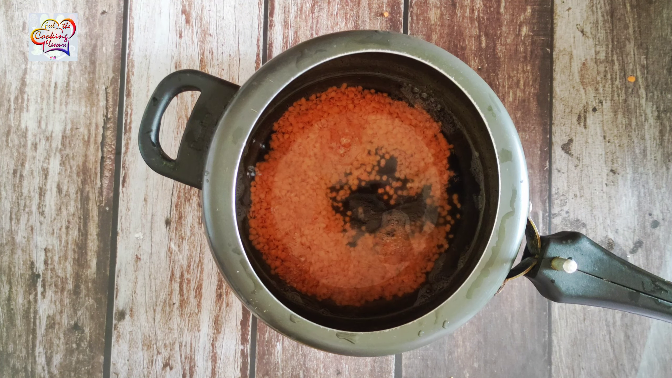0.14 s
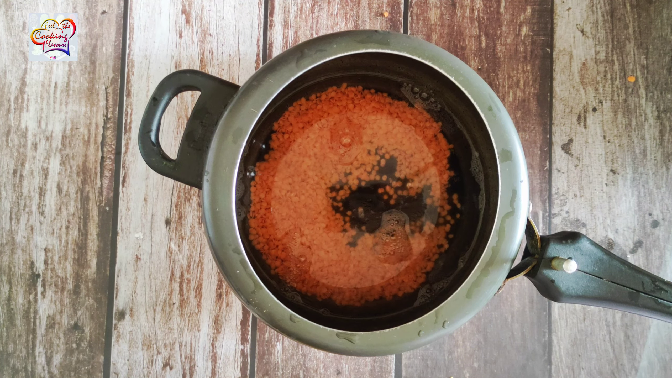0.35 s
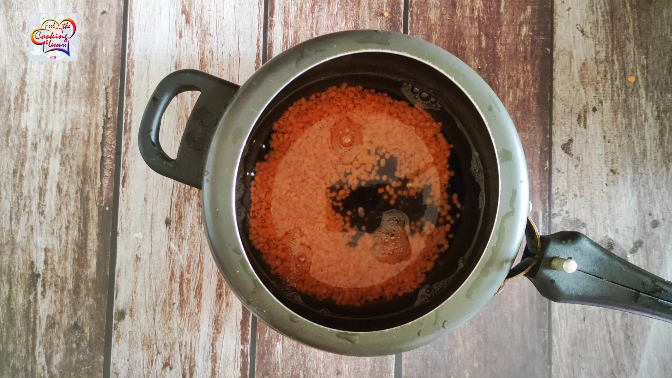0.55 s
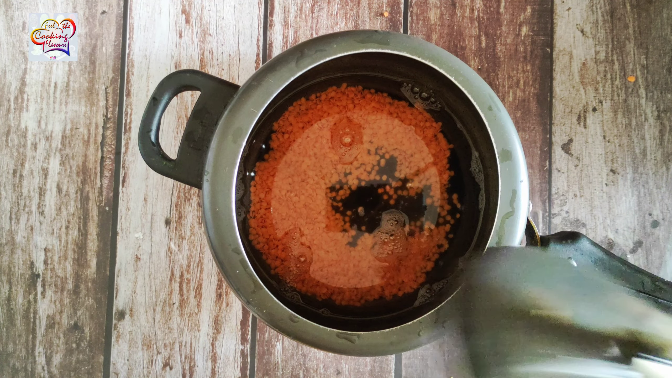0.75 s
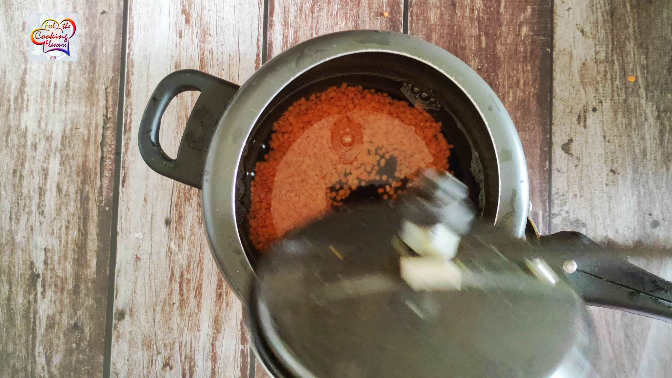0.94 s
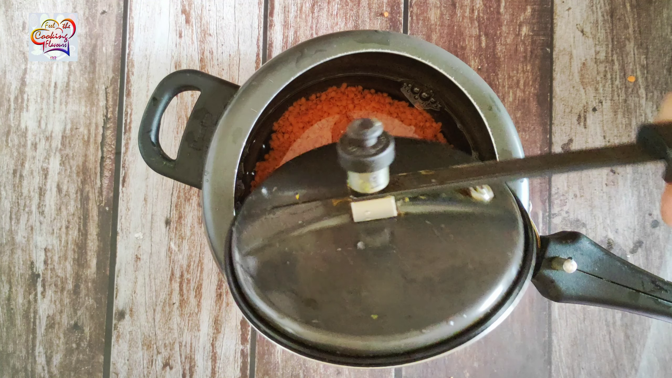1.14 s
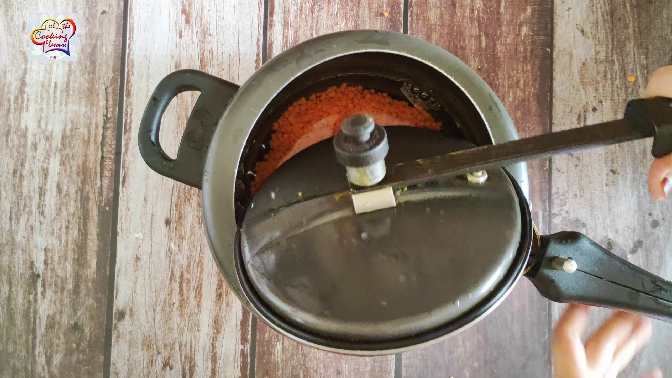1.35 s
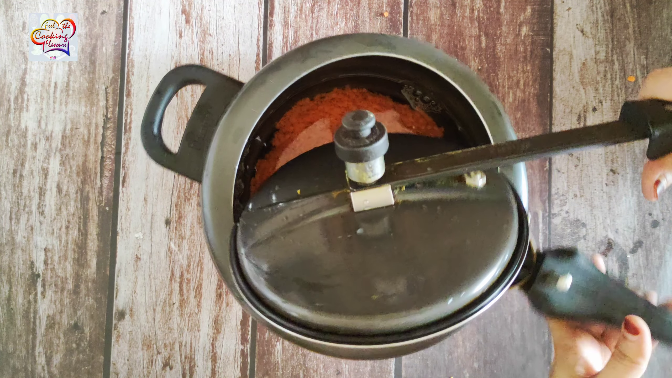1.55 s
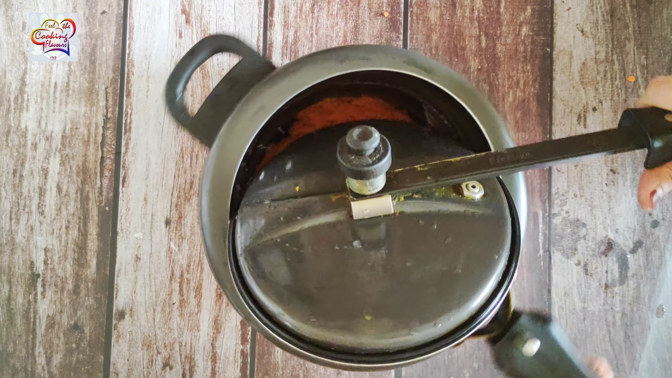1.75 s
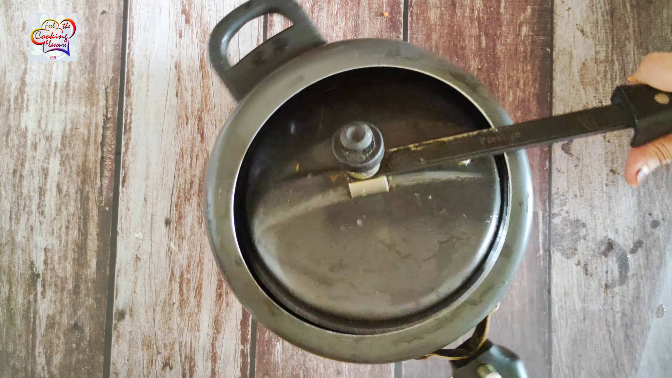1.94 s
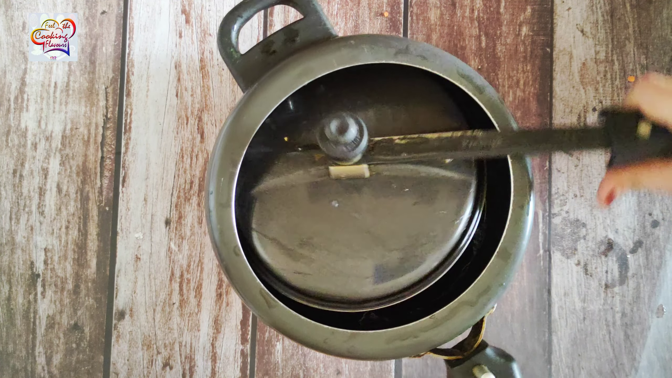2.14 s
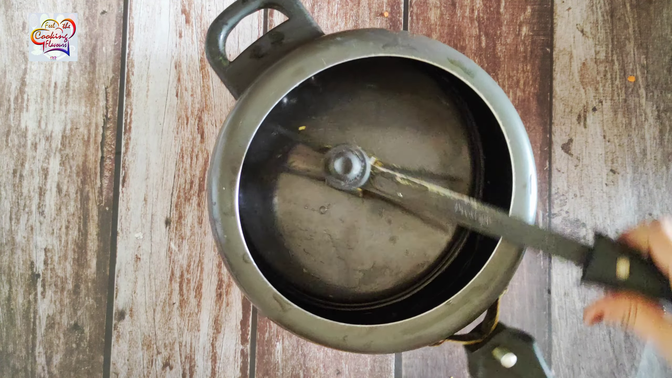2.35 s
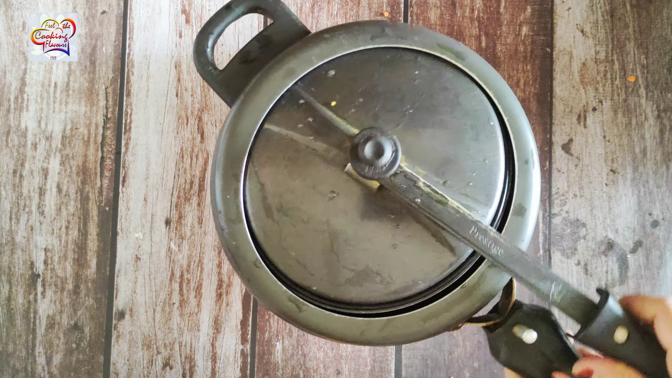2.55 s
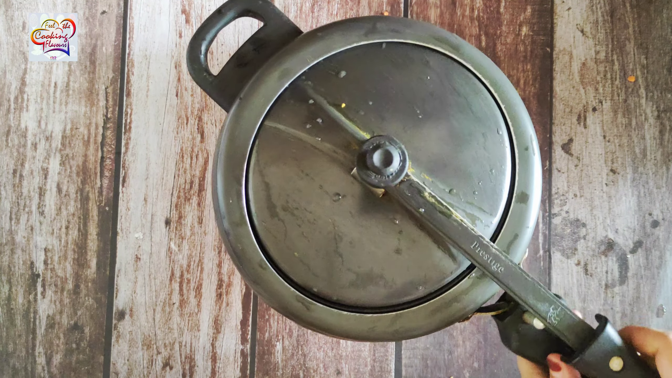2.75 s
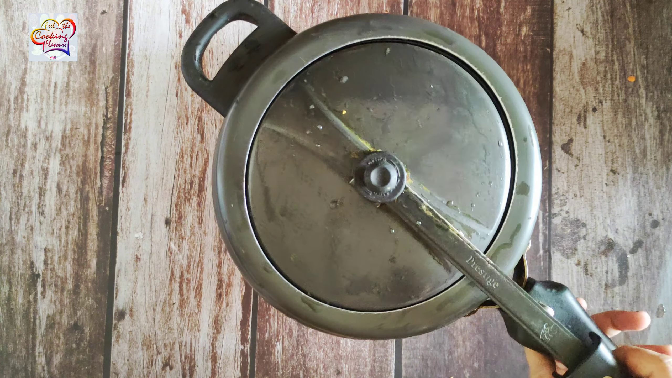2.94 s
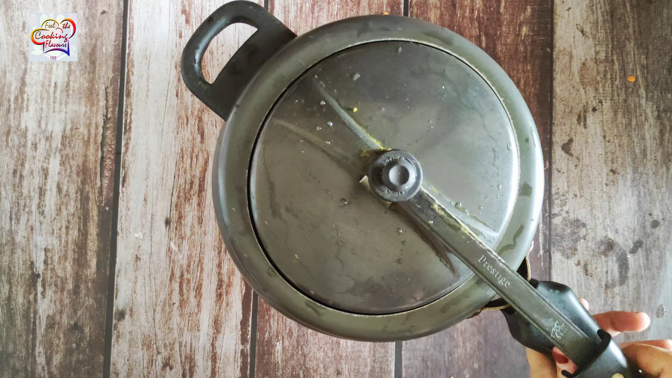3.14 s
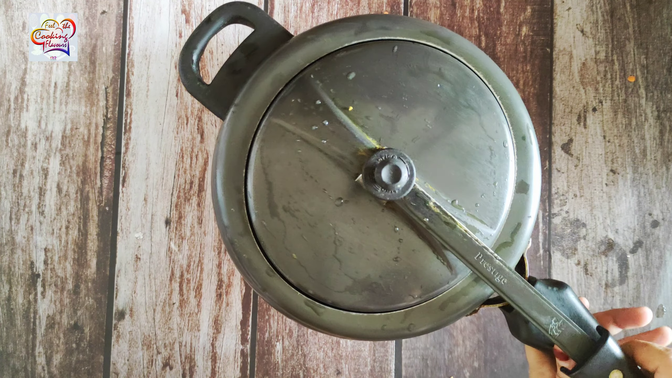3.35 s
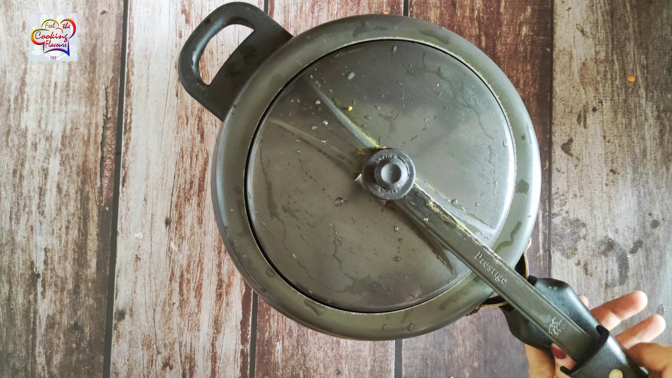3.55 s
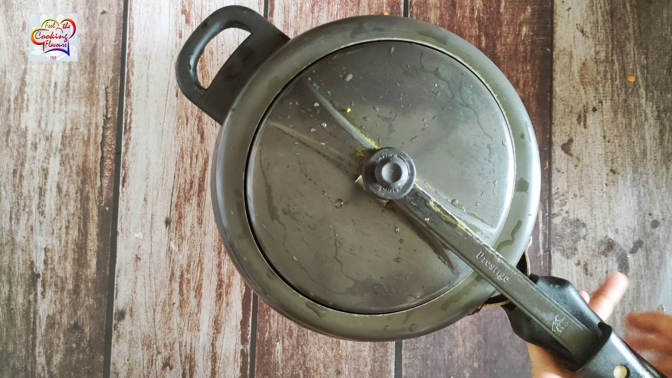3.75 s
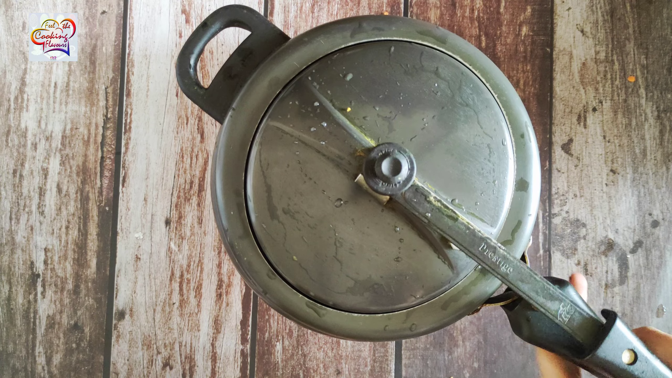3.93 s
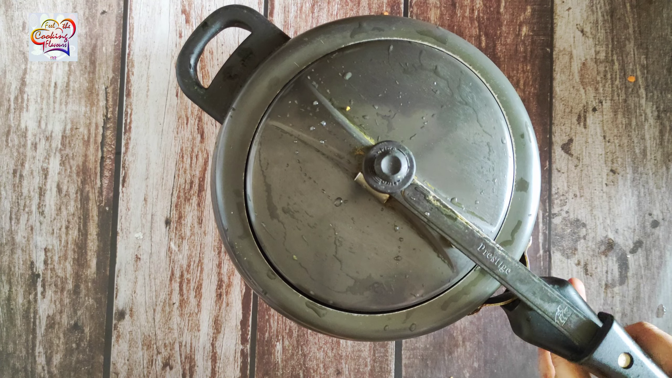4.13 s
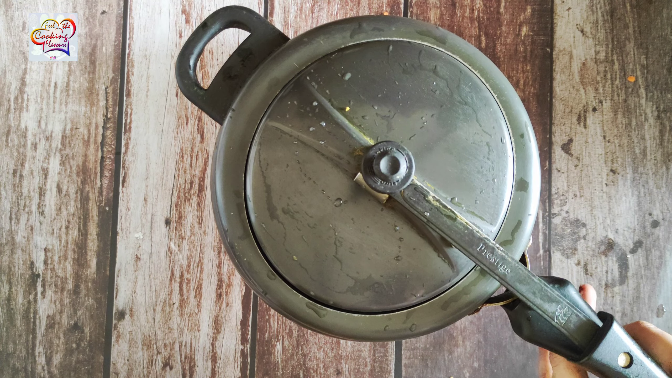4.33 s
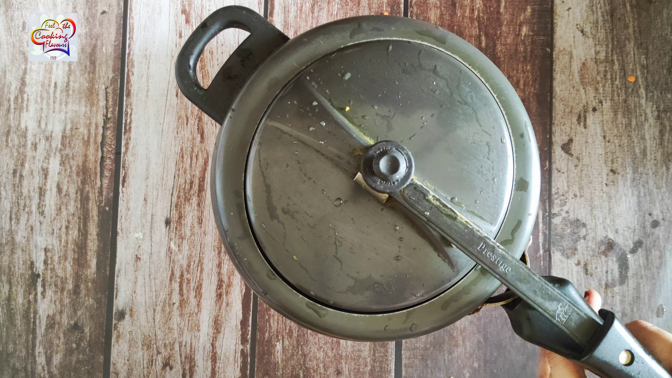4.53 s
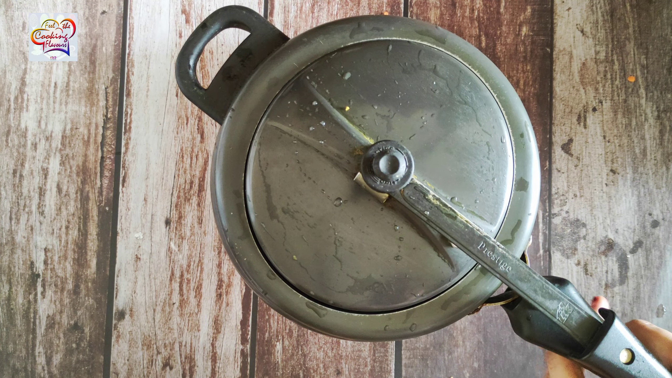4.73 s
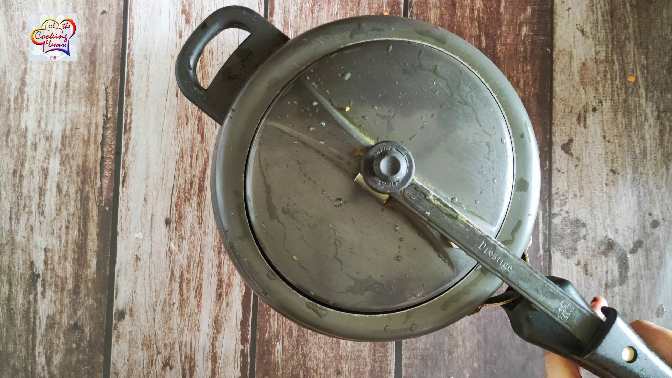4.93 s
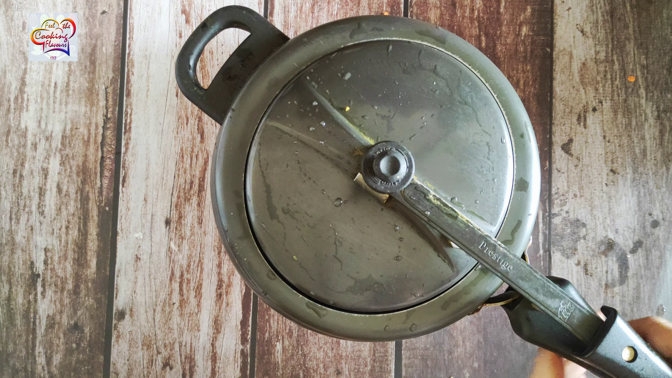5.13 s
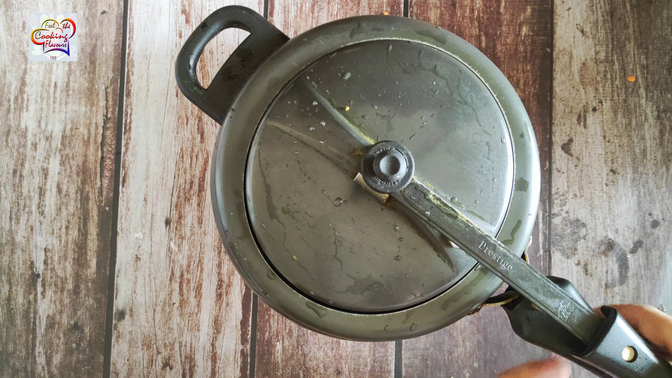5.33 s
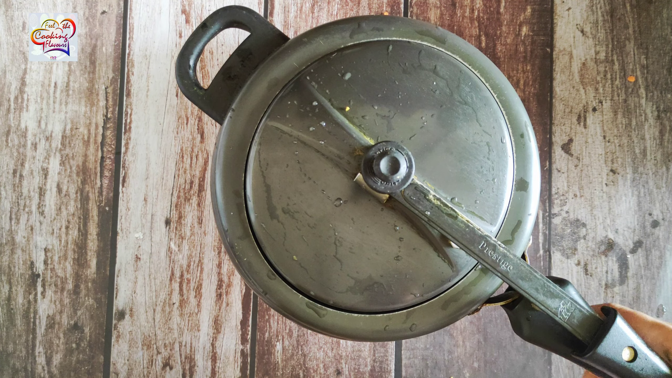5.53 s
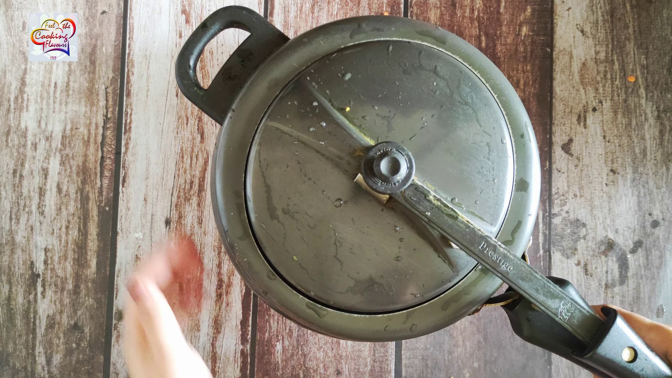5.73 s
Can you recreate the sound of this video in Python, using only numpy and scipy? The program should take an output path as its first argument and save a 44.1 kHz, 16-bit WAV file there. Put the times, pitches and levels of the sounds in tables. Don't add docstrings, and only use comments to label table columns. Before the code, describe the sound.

A steel pressure-pot lid is laid on the rim, scraped, turned and locked with ringing clanks, knocks and clicks in a small kitchen.

```python
import sys
import numpy as np
from scipy import signal
from scipy.fft import rfft, irfft, next_fast_len
from scipy.io import wavfile
from scipy.ndimage import uniform_filter1d, map_coordinates

SR = 44100
rng = np.random.default_rng(int(sys.argv[2]) if len(sys.argv) > 2 else 0)


def bounce(signal):
    frames = np.transpose(np.atleast_2d(signal))
    limited = np.clip(frames, -1, 1)
    pcm = np.round(limited * 32767).astype(np.int16)
    wavfile.write(sys.argv[1], SR, pcm)


def ratio(d):
    e = np.asarray(d, float) / 20
    return 10 ** e


N = 259308

# [t/s, crack level/dB, clank level/dB over the crack, shell level/dB over the crack]
LIFT = [(0.19, -67, -11, -15), (0.4611, -57, 11, -32), (0.551, -61, -3, 0), (0.636, -56, 1, 0),
        (0.6704, -46.5, 12, 2), (0.7564, -59.5, 13, -4), (0.833, -39.5, 0, -3), (0.8418, -46, -11, -30),
        (0.8656, -22, -6, -15.5), (0.8772, -38, -22, -20)]
LAY = [(1.2845, -33, 4.5, 6), (1.2945, -28, -15.5, 8.5), (1.309, -45, -5, 14.5), (1.3274, -60, -26, 10),
       (1.3932, -40, 3.5, 9.5), (1.4094, -45.5, 1, 18.5), (1.7094, -53, -12, 5), (1.7669, -49, 1.5, 4),
       (1.7913, -31.5, -7, -0.5), (1.8667, -28.5, -14, -6), (1.9085, -32, 2, -1), (1.9266, -34, -20, -43),
       (1.9647, -30.5, -16, -48)]
TURN = [(2.14, -31, -4, -1), (2.2204, -22, -2.5, -2.5), (2.2393, -19, -9.5, -7.5), (2.2694, -27.5, 2, -6),
        (2.3177, -30, -5, -5), (2.3306, -20, -3.5, 10), (2.3694, -36, -26, 9), (2.4014, -62, -3, 0),
        (2.4453, -23.5, 1.5, 2.5), (2.4594, -25.5, -20, 10), (2.4894, -45, -16, -8),
        (2.5374, -46.5, 27, -21)]
PULL = [(2.585, -24.5, 3, -0.5), (2.5978, -25.5, 9, -29), (2.6199, -18.5, -3, -2), (2.6344, -16, -8, -10),
        (2.6494, -38, -1, -19), (2.6644, -25, 6.5, -9.5), (2.7375, -45, 26.5, -9), (2.7584, -28.5, 9.5, 8),
        (2.7989, -34, 8, 6)]
SEAT = [(2.9801, -33, 5.5, 4), (3.0185, -32.5, -16, 5), (3.1293, -47, 7, 4), (3.1444, -41.5, 3, 19.5),
        (3.1672, -36, -3, -14), (3.1887, -28.5, 0.5, -28)]
LOCK = [(3.54, -58, -2, -11), (3.6473, -52, -5.5, 5), (3.7447, -59.5, 6, 14.5), (3.994, -40, -2, -44),
        (4.0043, -29, -13, -13.5), (4.0515, -31.5, -17, -9), (4.1184, -53, 3, 17.5),
        (4.137, -34.5, -9.5, -13), (4.3344, -51, -12, -36), (4.339, -38.5, -14, -6), (4.344, -45, -19, -7),
        (4.545, -37, -10, -17), (4.781, -20, -11.5, -12.5), (4.9369, -36.5, -10, -15),
        (5.019, -59, -13, 14.5), (5.2885, -60, -19, -17)]
CONTACT_HZ = [6500, 2200, 820, 320]

# [f/Hz, level/dB, t60/s]
FREE = [(546, 7, 0.059), (970, -1, 0.063), (1600, -7, 0.06), (2360, 5.5, 0.037), (2550, -7.5, 0.19),
        (2530, 8, 0.063), (3670, 4, 0.095), (4830, 2, 0.062), (7250, -5, 0.059)]
RIM = [(360, -10, 0.15), (405, -3, 0.062), (583, -5, 0.044), (783, 1, 0.063), (987, -1.5, 0.1),
       (1260, 2, 0.041), (1436, -6.5, 0.069), (2220, 0, 0.056), (2616, 1, 0.048), (3596, -5.5, 0.16),
       (4620, -5, 0.083)]
INSIDE = [(370, -32, 0.013), (525, -18, 0.33), (782, -5, 0.14), (906, -0.5, 0.032), (1005, -4, 0.056),
          (1553, -2.5, 0.044), (1770, 1.5, 0.024), (2094, 4, 0.027), (2570, -10.5, 0.064),
          (2828, -17, 0.076), (3830, -2.5, 0.027), (3580, -26.5, 0.032), (4680, -15, 0.18)]
RAISED = [(303, -7.5, 0.026), (525, -18, 0.042), (798, -9.5, 0.14), (1000, -13, 0.042), (1185, -8.5, 0.09),
          (1480, 5, 0.087), (1906, 0, 0.091), (2620, 0.5, 0.18), (3540, 3, 0.187), (4700, -1.5, 0.18)]
SEALED = [(334, -12.5, 0.044), (530, -1.5, 0.061), (667, -1, 0.043), (812, 3, 0.02), (963, 1.5, 0.062),
          (1864, -2, 0.029), (2120, -28.5, 0.015), (3552, -3.5, 0.063), (4600, -0.5, 0.034)]

# [t/s, level/dB, f/Hz]
THUDS = [(1.285, -35, 215.6), (1.406, -36, 176.4), (1.713, -40.5, 191), (1.872, -37.5, 123),
         (1.921, -41, 151), (2.589, -28.5, 270), (2.64, -29, 284), (2.688, -39, 260), (2.745, -30.5, 183.3),
         (2.787, -25, 171.7), (2.821, -29.5, 150.5), (2.85, -38.5, 188), (2.94, -31, 152.4),
         (2.984, -35, 179), (3.037, -41, 149), (3.154, -36.5, 165.5), (3.218, -47, 146),
         (3.385, -38.5, 176), (3.469, -48, 147), (3.946, -43.5, 181), (4.791, -45.5, 140)]
# [t/s, level/dB]
SLIDES = [
    [(1.29, -55.5), (1.39, -66.5), (1.56, -83)],
    [(1.66, -66), (1.72, -66), (1.77, -45.5), (1.89, -42.5), (1.95, -48.5), (2.0, -49), (2.08, -82)],
    [(2.22, -39.5), (2.26, -41.5), (2.31, -48), (2.37, -40), (2.43, -51), (2.48, -45), (2.535, -57)],
    [(2.535, -49), (2.584, -39), (2.592, -34), (2.65, -33), (2.73, -47), (2.77, -37.5), (2.83, -48.5),
     (2.9, -56.5), (2.97, -54)],
    [(2.98, -38), (3.03, -51.5), (3.1, -67.5), (3.15, -50.5), (3.22, -51), (3.32, -105)],
]
# [shell level/dB, drum level/dB]
SLIDE_BODY = [(8.5, 9.5), (-4.5, -2.5), (-0.5, -7.5), (-6.5, -8), (-3.5, -4.5)]
# [f/Hz, level/dB]
RASP = [(200, -17.5), (600, -7), (1270, -1), (1700, 4.0), (4000, -4.5), (9000, -4.5), (11000, -13), (16000, -19.5)]

# [t/s, length/s, level/dB, rise/s, sag/(dB/s)]
GONG = [(2.14, .07, -52, .015, 170), (2.22, .112, -37.5, .012, 20), (2.336, .185, -39.5, .025, 55),
        (2.587, .151, -38, .01, 30)]
BELL = [(2.14, 0.087, -46, 0.0083, 154), (2.22, 0.078, -34, 0.03, 220), (2.3, .3, -61, .04, -4),
        (2.635, 0.077, -40.5, 0.031, -4)]

# [t/s, level/dB]
KITCHEN_SWELL = [(0, -5), (.5, 0), (.9, -1), (1.15, 1), (2, 4), (3.4, 4), (3.9, 1.5), (4.4, -0.5), (5, 1),
                 (5.88, 0)]
# [f/Hz, level/dB per Hz]
HUM = [(25, -16), (48, 0.5), (62, -8.5), (80, -16.5), (120, -4), (165, -0.5), (250, -3.5), (400, -11),
       (800, -19.5), (1500, -29.5), (3000, -36)]
HISS = [(500, -17.5), (1500, 5.5), (3000, 7.5), (5000, -10.5), (9000, -5.5), (16000, -2.5)]
# [f/Hz, t60/s]
WALLS = [(200, 0.31), (1000, 0.37), (4000, 0.5), (10000, 0.36)]
# [f/Hz, level/dB]
ROOM_TONE = [(200, -5.5), (1000, -5.0), (3000, -6), (8000, -5)]

# [f/Hz, level/dB]
MICROPHONE = [(20, -1), (100, 2), (4200, -1), (6000, 1), (7200, 8.5), (8400, 3), (9200, -2.5), (9700, -10),
              (11000, -14.5), (15000, -17), (17000, -46)]
# [f/Hz, level/dB]
STARVED = [(1800, -60), (2400, -9), (3000, -4.5), (5400, -3.4), (6300, -7), (8400, -7), (9000, -2),
           (10000, -2), (16000, -4)]
# [t/s, level/dB]
FADE = [(0, 4), (.05, 3), (.062, -51), (.132, -58), (.142, -12), (.2, -3.5), (.35, -2.5)]
# [t/s, level/dB]
DROPOUT = [(2.609, 0), (2.613, -13), (2.619, -13), (2.6202, 0)]

TABLE_T60_S = 0.075
HUM_DB, HISS_DB, HISS_GROWS = -61.5, -86.5, 0.64
GONG_HZ, CLOSED_HZ, BELL_HZ = 326.3, 244.9, 761
CLOSING_S, CLOSING_TAKES_S = 2.64, 0.027
ATTACK_FROM_DB, DAMPED_DB_PER_S = -14.5, 802.5
RUB_S, RUB_GAP_S = 5.842, .0105


def unit(x):
    return x / np.sqrt(np.mean(x ** 2) + 1e-20)


def along(points, hz):
    f, v = np.transpose(sorted(points))
    return np.interp(np.log(hz + 1), np.log(f + 1), v)


def curves(rows, rest=None):
    s, *cols = np.transpose(rows)
    return [np.interp(np.arange(N) / SR, s, c, rest, rest) for c in cols]


def coloured(x, points):
    m = 2 * next_fast_len(len(x) // 2 + 2048)
    gain = ratio(along(points, np.fft.rfftfreq(m, 1 / SR)))
    cep = irfft(np.log(gain + 1e-6), m)
    cep[1:m // 2] *= 2
    cep[m // 2 + 1:] = 0
    return irfft(rfft(x, m) * np.exp(rfft(cep)), m)[:len(x)]


def resonant(x, modes):
    m = next_fast_len(N + SR // 2)
    f = np.fft.rfftfreq(m, 1 / SR)
    gain = 0
    for k, (hz, db, t60) in enumerate(modes):
        mode = 1j * f * np.sqrt(3 / t60) / (hz * hz - f * f + 3j * f / t60)
        gain = gain + (-1) ** k * ratio(db) * mode
    return irfft(rfft(x, m) * gain, m)[:N]


def wobble(rate):
    knots = rng.standard_normal(int(N * rate / SR) + 4)
    return map_coordinates(knots, [np.arange(N) * rate / SR])


def kitchen():
    slow_db, = curves(KITCHEN_SWELL)
    hum_db = HUM_DB + slow_db + .8 * wobble(3) + 1.5 * wobble(14)
    hiss_db = HISS_DB + HISS_GROWS * slow_db + 0.54 * wobble(1.9)
    hum = unit(coloured(rng.standard_normal(N), HUM)) * ratio(hum_db)
    hiss = unit(coloured(rng.standard_normal(N), HISS)) * ratio(hiss_db)
    return hum + hiss


def contacts(rows, modes, ring_db, crack_db, body_db, hollow_db, air_db, drum_db, rings, held=9):
    out, t = np.zeros(N + SR), np.arange(SR // 2) / SR
    hz, level, t60 = np.transpose(modes)[:, :, None]
    length = np.clip(rings, .1, 2.5)
    for s, db, clank_db, shell_db in rows:
        strength, detune = rng.standard_normal((2, len(modes), 1))
        drift = np.cumsum(rng.standard_normal((len(modes), len(t))), 1) * hz * 2.2e-5
        decay = ratio(level + 3.5 * strength - 60 * t / (t60 * length))
        ring = np.sum(decay * np.sin(2 * np.pi * hz * (1 + 0.011 * detune) * t + drift), 0)
        ring *= ratio(-60 * np.clip(s + t - held, 0, 1) / 0.027) * (1 - np.exp(-t / 0.0011))
        crack = 1.06 * ratio(-60 * t / 0.01) + 0.36 * ratio(-60 * t / (0.15 * length))
        crack *= (1 - np.exp(-t / 0.0003)) * rng.standard_normal(len(t))
        clank, shell, drum = np.add((clank_db, shell_db, shell_db + drum_db), body_db)
        tone = [(60, drum - 27), *zip(CONTACT_HZ, [0, clank, shell, drum]),
                (1270, (clank + shell) / 2 - 2.5), (4500, hollow_db), (9000, 0), (12000, air_db)]
        blow = coloured(ratio(ring_db) * ring + ratio(crack_db) * crack, tone)
        out[round(s * SR):][:len(t)] += ratio(db) * blow
    return out[:N]


def lid():
    rub = [(RUB_S + k * RUB_GAP_S, -78, 21, 14) for k in range(4)]
    return (contacts(LIFT, FREE, ring_db=-18.5, crack_db=-3.5, body_db=6.5,
                     hollow_db=-6, air_db=-7.0, drum_db=-10, rings=0.35)
            + contacts(LAY, RIM, ring_db=-13.5, crack_db=-3.5, body_db=7.5,
                       hollow_db=1.5, air_db=-9.0, drum_db=2.0, rings=0.71)
            + contacts(TURN, INSIDE, ring_db=-8, crack_db=-4, body_db=4.5,
                       hollow_db=2.0, air_db=-11.0, drum_db=-18, rings=.95, held=2.3)
            + contacts(PULL, RAISED, ring_db=-24.5, crack_db=-7.5, body_db=8.0,
                       hollow_db=-3.0, air_db=5.0, drum_db=7, rings=0.47, held=3.6)
            + contacts(SEAT, SEALED, ring_db=-19.5, crack_db=0, body_db=8,
                       hollow_db=0.0, air_db=-7.5, drum_db=-21, rings=0.69)
            + contacts(LOCK, SEALED, ring_db=-20.0, crack_db=-2.5, body_db=9.5,
                       hollow_db=-6, air_db=-3.5, drum_db=-4.5, rings=0.78)
            + contacts(rub, SEALED, ring_db=-12, crack_db=-2.5, body_db=11.5,
                       hollow_db=-26, air_db=-13, drum_db=-24, rings=0.91))


def thuds():
    out, t = np.zeros(N + SR), np.arange(SR // 3) / SR
    for s, db, hz in THUDS:
        swing = np.sin(2 * np.pi * hz * t)
        swing += 0.38 * np.sin(2 * np.pi * 1.8 * hz * t)
        swing += 0.32 * np.sin(2 * np.pi * 0.565 * hz * t)
        envelope = ratio(db + 5.0 - 60 * t / TABLE_T60_S) * (1 - np.exp(-t / 0.0057))
        out[round(s * SR):][:len(t)] += envelope * swing
    return out[:N]


def slides():
    out = np.zeros(N)
    for rows, (shell_db, drum_db), modes in zip(SLIDES, SLIDE_BODY, (RIM, RIM, INSIDE, RAISED, SEALED)):
        stroke = ratio(curves(rows, -120)[0])
        knocks = (rng.random(N) < 220 / SR) * ratio(1.6 * rng.standard_normal(N))
        chatter = .35 + signal.lfilter([1], [1, -np.exp(-1 / (.004 * SR))], knocks)
        grit = unit(rng.standard_normal(N) * chatter * ratio(1.2 * wobble(30))) * stroke

        def driven(lo, hi):
            part = [m for m in modes if lo < m[0] < hi]
            return resonant(grit, part) / np.std(resonant(rng.standard_normal(N), part))

        out += 0.84 * 1.44 * coloured(grit, RASP)
        out += 0.37 * driven(1100, 9000)
        out += ratio(shell_db) * driven(500, 1100)
        out += ratio(drum_db) * driven(0, 500)
    return out


def clear_modes():
    out, t = np.zeros(N), np.arange(N) / SR
    closing = np.exp(np.clip((t - CLOSING_S) / CLOSING_TAKES_S, -30, 30))
    sinking = CLOSED_HZ + (GONG_HZ - CLOSED_HZ) / (1 + closing)
    for notes, pitch in ((GONG, sinking), (BELL, BELL_HZ)):
        size = np.zeros(N)
        for s, length, db, rise, sag in notes:
            swell_db = ATTACK_FROM_DB * np.clip(1 - (t - s) / rise, 0, 1)
            sag_db = sag * np.clip(t - s - rise, 0, 1)
            damped_db = DAMPED_DB_PER_S * np.clip(t - s - length, 0, 1)
            size += (t > s) * ratio(db + swell_db - sag_db - damped_db)
        size = uniform_filter1d(size, size=400) * ratio(-1 + 1.5 * wobble(40))
        phase = 2 * np.pi * np.cumsum(pitch + 4 * wobble(25)) / SR
        out += np.sqrt(2) * size * np.sin(phase)
    return out


def walls(x):
    out, step = np.zeros(N + 2 * SR), SR // 5
    for i in range(0, N, step):
        hz, t, z = signal.stft(rng.standard_normal(SR * 2 // 3), SR, nperseg=256)
        decay = ratio(-60 * t / along(WALLS, hz)[:, None])
        tail = signal.istft(z * decay, SR, nperseg=256)[1]
        wet = signal.fftconvolve(x[i:i + step], tail / np.linalg.norm(tail))
        out[i + 300:][:len(wet)] += wet
    return out[:N]


def thinned(x):
    hz, t, z = signal.stft(x, SR, "cosine", nperseg=2048, noverlap=1024)
    band_hz = hz[4:1024:8][:, None]
    bands = (np.abs(z[:1024]) ** 2).reshape(128, 8, -1).mean(1)
    around = uniform_filter1d(bands, size=9, axis=0)
    limit = ratio(2 * (along(STARVED, band_hz) + 1.5 * rng.standard_normal(bands.shape)))
    treble = bands[12:].sum(0)
    attack = treble > 2.5 * np.roll(treble, 1)
    spared = (attack | np.roll(attack, 1)) & (band_hz < 11000)
    keep = np.repeat(spared | (bands > limit * around), 8, axis=0)
    keep = np.vstack([keep, keep[-1:]])
    return signal.istft(z * keep, SR, "cosine", nperseg=2048, noverlap=1024)[1][:N]


def scene():
    pot = lid() + thuds() + slides()
    room = coloured(walls(pot), ROOM_TONE)
    return (pot + clear_modes() + room + kitchen())[None]


def roll_off(x):
    return signal.sosfilt(signal.butter(12, 16540, fs=SR, output="sos"), x)


def record(dry):
    heard = thinned(coloured(dry[0], MICROPHONE))
    heard = heard * ratio(curves(FADE)[0] + curves(DROPOUT)[0])
    return roll_off(heard[None])


dry = scene()
out = record(dry)
bounce(out)
```